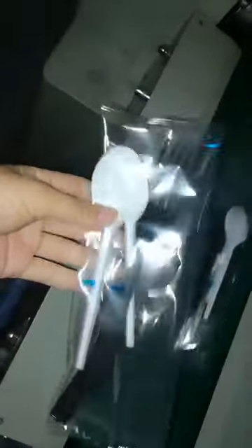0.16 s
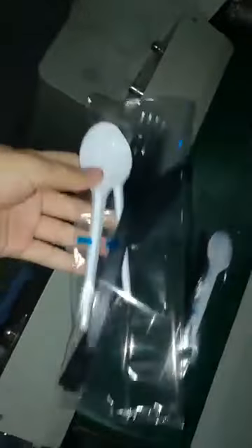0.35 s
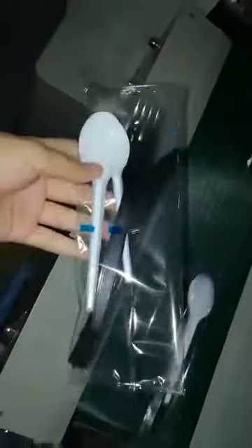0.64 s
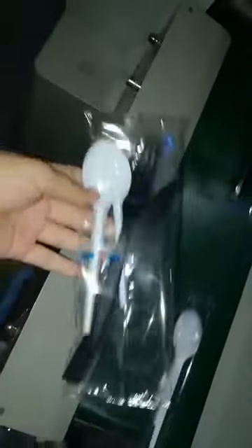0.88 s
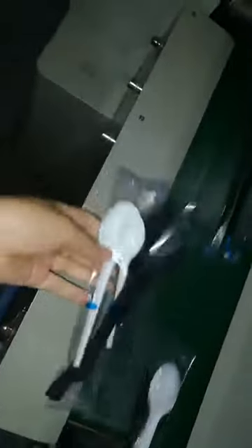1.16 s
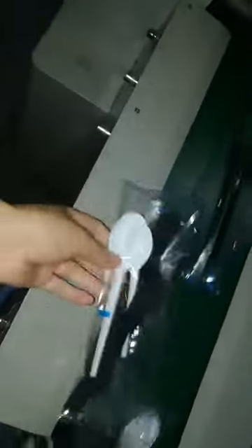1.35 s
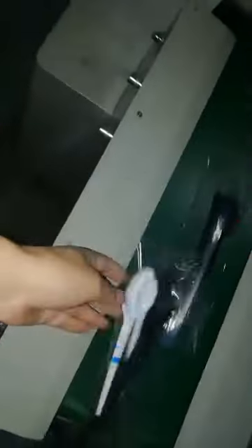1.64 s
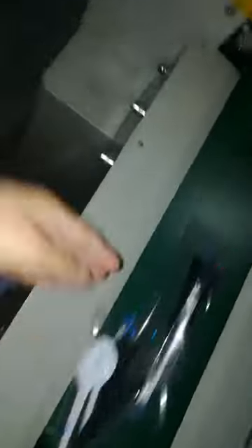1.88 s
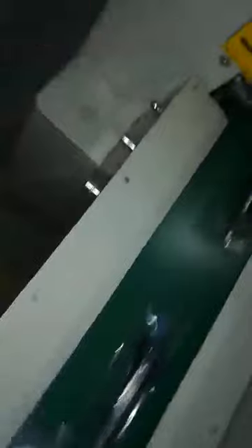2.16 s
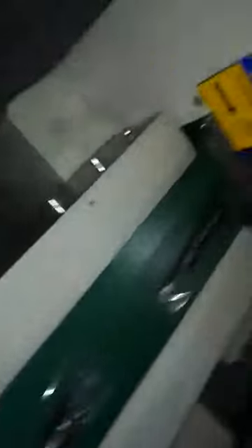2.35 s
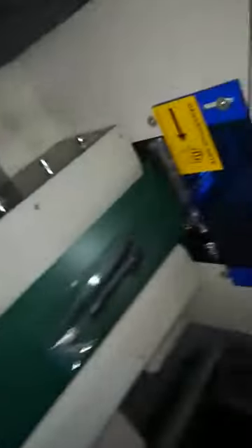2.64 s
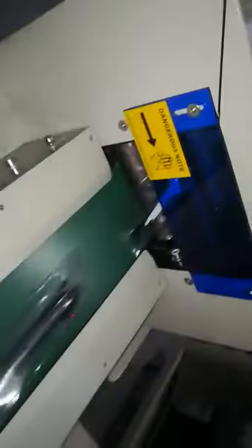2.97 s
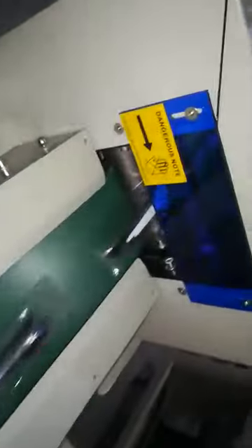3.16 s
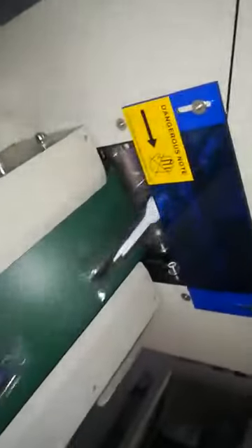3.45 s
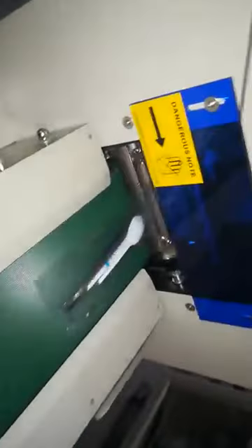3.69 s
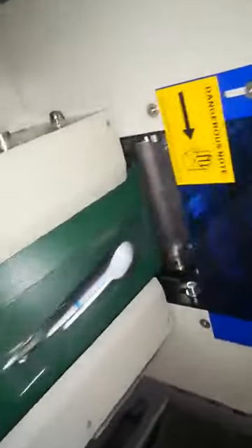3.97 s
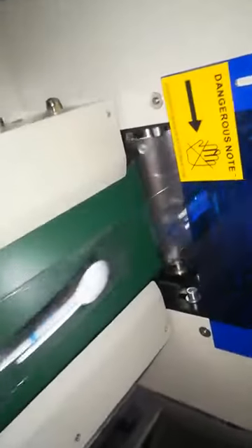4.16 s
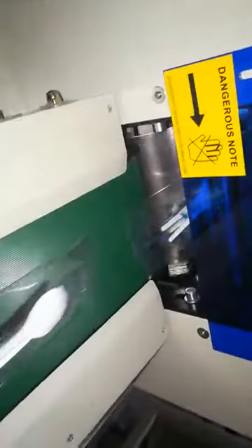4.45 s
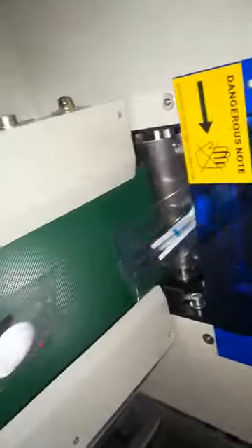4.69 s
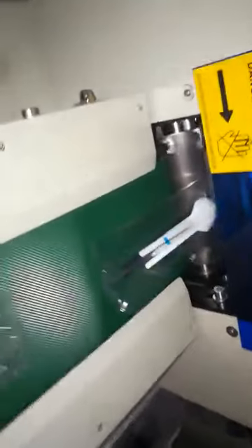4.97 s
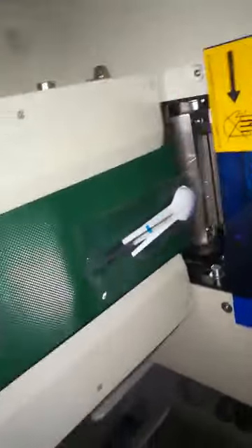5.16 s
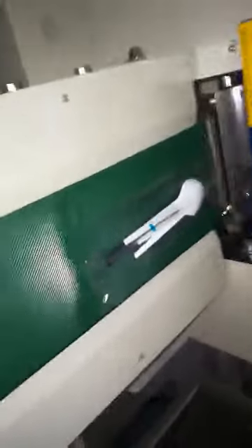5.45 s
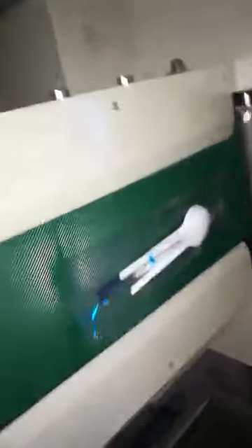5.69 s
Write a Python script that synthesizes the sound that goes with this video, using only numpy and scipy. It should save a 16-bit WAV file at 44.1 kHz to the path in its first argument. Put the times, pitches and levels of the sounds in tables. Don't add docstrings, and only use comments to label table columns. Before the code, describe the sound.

Steady film hiss and low motor hum in a workshop, opened by a sharp bag snap and later broken by crackles and tiny steel rings.

```python
import sys
import numpy as np
from scipy import signal
from scipy.fft import rfft, irfft
from scipy.io import wavfile
from scipy.ndimage import uniform_filter1d

SR = 44100
rng = np.random.default_rng(int(sys.argv[2]) if len(sys.argv) > 2 else 0)


def store_pcm(level_fs):
    pcm = np.round(np.clip(level_fs, -1, 1) * 32767).astype(np.int16)
    wavfile.write(sys.argv[1], SR, np.atleast_2d(pcm).T)


def voltage_ratio(decibels):
    exponent = np.asarray(decibels, float) / 20
    return 10 ** exponent


N = 256662
T = np.arange(N) / SR
HZ = np.fft.rfftfreq(N, 1 / SR)

# [start_s, openness_db, standing_wave_valley_hz]
PLACE = [(0, 0.5, 680), (.6, -0.5, 690), (1.1, 0, 654), (1.6, -1.5, 630), (2.05, 0, 546), (2.9, -0.5, 450),
         (3.2, 1.5, 430), (3.6, -0.5, 461), (4.1, 1, 550), (4.26, 7, 530), (4.9, 8, 530), (5.2, 6.5, 510),
         (5.82, 6.5, 488)]

# [start_s, hiss_db, sheen_db, left_minus_right_db]
FILM = [(.3, -37.5, 3, 0), (.8, -36.5, -0.5, -1), (1.2, -37.5, -2, -2), (1.6, -39.5, -2, -2),
        (1.95, -39, -0.5, 1), (2.55, -35, -3.5, -1), (2.8, -32, -7, 1), (3.1, -33.5, -5, 0),
        (3.45, -32.5, -5.5, 2.5), (3.7, -39.5, -2, 3.5), (4.0, -40, -2.5, 4), (4.16, -38.5, -2, 2.5),
        (4.25, -33, -3, 4.5), (4.5, -31, -5.5, 0), (5.1, -32.5, -2.5, -1.5), (5.34, -30.5, -4, 0),
        (5.47, -34.5, -2, -1), (5.8, -33.5, -1, 3.5)]
FILM_EDGES = [1700, 3200, 6000, 9700]


def film():
    body_db, sheen_db, pan_db = curves(FILM)
    open_db = curves(PLACE)[0]
    pops_per_s, pop_fade_s = 500, .001
    pops = (rng.random(N) < pops_per_s / SR) * voltage_ratio(3 * rng.exponential(size=N))
    grain = 1 + .2 * signal.lfilter([1], [1, -np.exp(-1 / (pop_fade_s * SR))], pops)
    hiss = reflections(noise_pair(), fine_db=3.0, broad_db=0.25) * grain
    rustle_db = .35 * walk(11)
    low_db = -4.5 + 0.74 * sheen_db
    air_db = -8 + 0.69 * sheen_db + 0.13 * open_db + glint()
    out = np.zeros((2, N))
    for band, tilt_db in zip(bands(hiss, ports(), FILM_EDGES), [low_db, 0, sheen_db, air_db]):
        out += band * voltage_ratio(body_db + tilt_db + rustle_db + 0.2 * walk(20))
    return panned(out, pan_db - np.mean(pan_db))


def glint():
    jaws_s, rise_s, fade_s, lead_s = 4.24, 0.11, 0.27, 1
    late, early = np.maximum(T - jaws_s, 0), np.maximum(jaws_s - T, 0)
    flare_db = 7.5 * np.exp(-late / fade_s - (early / rise_s) ** 2)
    return flare_db + 1.5 * np.exp(-early / lead_s)


# [start_s, body_db, air_db, t60_s, left_minus_right_db]
SNAP = [
    (.1165, -14, -33, .06, -1.5),
    (.1205, -18, -32, 0.045, 1),
    (.1245, -23, -15, 0.029, 6),
    (.1266, -9, -9.5, 0.016, 7),
    (.131, -14.5, -18, 0.041, -1.5),
    (.135, -29, -40, 0.71, -2),
    (.142, -29, -26, .045, -7),
    (.1915, -27.5, -45, 0.095, -5),
    (.206, -39, -46, 0.063, 0),
]
# [pitch_hz, lift_db]
BAG_LIFT = [(380, 2), (750, 14.5), (1500, 10.5), (3200, 11), (5000, 15.5), (6200, 1), (8500, 11),
            (12000, 7.5)]


def bag_snap():
    return creases(SNAP, BAG_LIFT)


# [start_s, body_db, air_db, t60_s]
CRUNCH = [(1.3, -47, -38, 0.56), (1.49, -31, -44, 0.091), (1.51, -34, -43, 0.067), (1.526, -35, -44, .04),
          (1.685, -44, -48, .06), (2.4, -37, -38, .048), (2.683, -24, -46, .05), (2.747, -26, -45, .047),
          (2.803, -26, -36, 0.093), (2.821, -24, -28, 0.11), (2.841, -28.5, -39, 0.17),
          (2.928, -40, -36, .05), (3.133, -37, -42, .046), (3.184, -29.5, -35, 0.17),
          (3.228, -30.5, -30, 0.099), (3.32, -37, -31, 0.091), (3.385, -40, -38, .1),
          (3.448, -30, -39, 0.084), (4.365, -34, -21.5, 0.11), (4.54, -26, -30, .084),
          (4.797, -28, -30, 0.06), (4.983, -31, -23, 0.046), (5.008, -20, -35, .05),
          (5.319, -27.5, -43, 0.32), (5.351, -30, -43, 0.16)]
# [start_s, left_minus_right_db]
CRUNCH_PAN = [(1.5, -6), (2.5, -3), (3.2, 12), (3.5, 5), (4.5, 2), (5.3, 3)]
# [pitch_hz, lift_db]
RUSTLE_LIFT = [(1500, -5.5), (3500, -1), (5200, 3), (6500, -12), (11000, 9)]


def belt_crunches():
    belt = [(*row, np.interp(row[0], *np.transpose(CRUNCH_PAN))) for row in CRUNCH]
    return creases(belt, RUSTLE_LIFT)


def creases(table, lift):
    rise_s, split_hz = .0005, 6500
    envelope = np.zeros((2, 2, N))
    for s, body_db, air_db, t60, pan_db in table:
        i = int(s * SR)
        age = T[i:i + 12000] - s
        shape = (1 - np.exp(-np.abs(age) / rise_s)) * voltage_ratio(-60 * age / t60)
        strength = voltage_ratio(np.array([body_db, air_db]))
        envelope[..., i:i + len(age)] += np.multiply.outer(strength, panned(shape, pan_db))
    gain = ports() * voltage_ratio(over_hz(lift))
    air = above(split_hz)
    rough = noise_pair() * voltage_ratio(1.2 * walk(900))
    out = np.zeros((2, N))
    for level, part in zip(envelope, [1 - air, air]):
        out += colour(rough * level, gain * part) / np.sqrt(np.mean((gain * part) ** 2))
    return out


# [pitch_hz, level_db, t60_s]
CLACK = [(783, -7.5, 3.7), (1630, -4.5, 0.23), (1870, -22, 0.096), (2870, -1, 0.17), (3280, 1.5, 0.1),
         (4200, -19, 0.16), (4560, -13, 0.049), (4750, -3, 0.062), (5240, -23, 0.31), (5700, -4, 0.25)]


def clack():
    start_s, level_db, rise_s, longest_t60 = .1262, -20, .0008, .09
    age = np.maximum(T - start_s, 0)[:SR // 2]
    rings = np.zeros((2, len(age)))
    for (hz, db, t60), turn in zip(CLACK, rng.random((len(CLACK), 2))):
        phase = turn[0] + .25 * turn[1] * np.array([[0], [1]])
        rings += voltage_ratio(db - 60 * age / min(t60, longest_t60)) * np.sin(2 * np.pi * (hz * age + phase))
    return np.pad(voltage_ratio(level_db) * rings * np.minimum(age / rise_s, 1), ((0, 0), (0, N - len(age))))


# [pitch_hz, left_db, right_db]
PARTS = [
    [(5724, 0, -7), (3424, -13, -5)],
    [(5165, 0, -9)],
    [(8796, -18, 0), (12174, -36, -14), (12834, -38, -19)],
    [(8163, -3, 0), (11620, -26, -12)],
]
# [start_s, held_s, level_db, left_minus_right_db]
TOUCHES = [
    [(4.482, 0.088, -23.5, 0), (4.55, 0.049, -31, 2), (4.595, .05, -31, 7), (4.655, 0.14, -34, -9),
     (4.77, .19, -35, 0)],
    [(4.49, .04, -29, 6), (4.538, 0.07, -27, 10), (4.61, .09, -36, 1), (4.74, .13, -33, -5)],
    [(4.505, 0.028, -28, -3), (4.533, 0.056, -23, -7), (4.70, .17, -31, 2)],
    [(4.60, .05, -25, 7), (4.668, .04, -26, -2), (4.728, 0.038, -25.5, -9), (4.778, .09, -35, -6)],
]


def jingle():
    level_db, rise_s, t60, choke_s, left_over_db, beat_hz = 3, .007, .6, .018, -14, 45
    out = np.zeros((2, N))
    for modes, touches in zip(PARTS, TOUCHES):
        for (s, held, db, pan_db), turn in zip(touches, rng.random((len(touches), 3))):
            i = int(s * SR)
            age = T[i:i + 20000] - s
            choke = np.exp(-np.maximum(age - held, 0) / choke_s) + voltage_ratio(left_over_db - 79 * age)
            beat = 1 + 0.13 * np.sin(2 * np.pi * (beat_hz * age + turn[2]))
            shape = (1 - np.exp(-np.abs(age) / rise_s)) * voltage_ratio(db - 60 * age / t60) * choke * beat
            phase = turn[0] + np.array([[0], [.2 * turn[1]]])
            ring = np.zeros((2, len(age)))
            for hz, *ports_db in modes:
                ring += voltage_ratio(np.array(ports_db))[:, None] * np.sin(2 * np.pi * (hz * age + phase))
            out[:, i:i + len(age)] += panned(ring * shape, pan_db)
    return voltage_ratio(level_db) * out


# [start_s, held_s, level_db]
MOTOR = [(.15, 0.11, -50), (.42, 0.056, -53), (.72, 0.12, -50.5), (1.0, 0.037, -54), (1.28, .3, -55),
         (1.92, .1, -49.5), (2.05, 0.27, -49), (2.5, 0.062, -53), (2.73, .05, -55), (3.07, 0.13, -49),
         (3.27, 0.14, -48), (3.6, .18, -56), (3.89, 0.035, -51), (4.2, .08, -43), (4.45, 0.073, -43),
         (4.76, .13, -45.5), (5.03, 0.044, -43.5), (5.15, 0.038, -50), (5.36, 0.039, -45),
         (5.62, 0.11, -43.5)]
# [start_s, held_s, level_db, pitch_hz]
GEAR = [(.75, .06, -48.5, 265), (.95, 0.25, -50.5, 285), (1.22, 0.13, -57, 260), (1.38, 0.05, -57, 278),
        (1.68, 0.2, -51.5, 289), (2.08, 0.075, -48, 280), (2.26, 0.11, -52, 268), (2.54, 0.026, -49.5, 272),
        (2.7, 0.084, -54, 290), (3.8, 0.095, -55.5, 250), (4.22, 0.14, -49.5, 250.3),
        (4.8, 0.27, -61, 240.4), (5.3, .12, -51, 268.8), (5.62, 0.18, -52, 332)]


def motor():
    casing_hz, frame_hz, frame_db = 177.1, 106.5, -58
    gear_middle_s = [s + held / 2 for s, held, *_ in GEAR]
    gear_hz = np.interp(T, gear_middle_s, [row[-1] for row in GEAR])
    casing = tone(casing_hz + 2.5 * walk(14), swells(MOTOR, idle_db=-59) - 2 + 2 * walk(18))
    gear = tone(gear_hz + 7 * walk(15), swells(GEAR, idle_db=-70) - 1 + 3 * walk(22))
    frame = tone(frame_hz + 4 * walk(9), frame_db + curves(PLACE)[0] - 8 + 5 * walk(13))
    return casing + gear + frame


def swells(table, idle_db):
    swell_s = 0.034

    def rise(s):
        return np.clip((T - s) / swell_s + .5, 0, 1) ** 2

    total = voltage_ratio(idle_db)
    for s, held, db, *_ in table:
        total = total + voltage_ratio(db) * (rise(s) - rise(s + held + swell_s))
    return 20 * np.log10(total)


# [start_s, level_db]
WHINE = [(0, -57), (1.5, -48), (2.2, -65), (3, -50.5), (3.7, -45.5), (4.1, -48.5), (4.7, -53), (4.95, -50),
         (5.82, -48)]
# [pitch_hz, level_db]
WHINE_LINES = [(9997, -3), (9964, -5), (10026, -6), (9808, -10), (10190, -11), (15052, -29)]


def whine():
    db = curves(WHINE)[0] + curves(PLACE)[0]
    lines = sum(tone(hz + 7 * walk(25), db + line_db + 4 * walk(22)) for hz, line_db in WHINE_LINES)
    return lines * voltage_ratio(np.array([[-22], [4]]))


# [pitch_hz, density_db_per_hz]
HALL_COLOUR = [(15, -50), (25, -3.5), (49, -13), (91, 1.5), (129, -3.5), (184, 1.5), (301, 2.5), (386, -23),
               (633, -21.5), (1060, -16), (1350, -18), (1800, -18.5), (2210, -101), (3740, -120)]
HALL_EDGES = [0, 360, 560, 850]
# [centre_hz, level_db over the rumble, extra_share of openness, valley_depth_db]
ROAR = [(450, -10, 0.54, 5.5), (690, -9.5, 0.23, 8), (1200, -3.5, -.1, .5)]


def hall():
    rumble_db, valley_octaves = -48, 0.47
    open_db, valley_hz = curves(PLACE)
    levels_db = [-2.5]
    for hz, db, share, depth_db in ROAR:
        valley = np.exp(-(np.log2(valley_hz / hz) / valley_octaves) ** 2)
        levels_db.append(db + share * open_db - depth_db * valley)
    roar = reflections(noise_pair(), fine_db=1.8, broad_db=.4)
    out = np.zeros((2, N))
    for band, db in zip(bands(roar, voltage_ratio(over_hz(HALL_COLOUR)), HALL_EDGES), levels_db):
        out += band * voltage_ratio(rumble_db + open_db + db + .8 * walk(5.6))
    return out


# [pitch_hz, share_0_to_1]
ALIKE = [(60, 1), (200, 0.93), (340, 0.7), (500, 0), (1000, 0.14), (3800, 0.1), (5300, 0.14), (5750, 0.92),
         (6900, 0.85), (7700, 0.17), (15000, 0)]


def noise_pair():
    lag_s = 18 / SR
    left, own = rfft(rng.standard_normal((2, N)))
    share = np.clip(over_hz(ALIKE), 0, .999)
    late = np.exp(-2j * np.pi * HZ * lag_s * (HZ > 450) * (HZ < 5500))
    right = share * left * late + np.sqrt(1 - share ** 2) * own
    return irfft(np.array([left, right]), N)


# [pitch_hz, density_db_per_hz]
LEFT_PORT = [(500, -18), (1400, -60), (1900, -3.5), (3000, -9.5), (3700, -3), (4400, -1), (5200, 3.5),
             (5900, 1), (6600, -4), (8800, -16), (10000, -93), (11000, -76), (12500, -99), (15500, -43)]
# [pitch_hz, density_db_per_hz]
RIGHT_PORT = [(500, -12), (1400, -4), (1900, -4.5), (2400, 0.5), (3200, 1), (4500, -1), (5200, -1.5),
              (5800, -1), (6500, -2.5), (8600, 2.5), (10300, -6), (11300, -10), (14600, -18), (15800, -26)]


def ports():
    return voltage_ratio(np.array([over_hz(LEFT_PORT), over_hz(RIGHT_PORT)]))


def reflections(x, fine_db, broad_db, hold=14):
    spectra = signal.stft(x, nperseg=2048)[2]
    for db, size in [(fine_db, 2), (broad_db, 24)]:
        ridges = uniform_filter1d(rng.standard_normal(spectra.shape[1:]), size, axis=0)
        ridges = uniform_filter1d(ridges, hold, axis=1, mode="wrap")
        spectra = spectra * voltage_ratio(db * np.clip(ridges / np.std(ridges), -3, 1.7))
    return signal.istft(spectra, nperseg=2048)[1][:, :N]


def bands(x, gain, edges):
    steps = [above(hz + 1) for hz in edges] + [0]
    return [unit(colour(x, gain * (lower - upper))) for lower, upper in zip(steps, steps[1:])]


def unit(x):
    return x / np.sqrt(np.mean(np.mean(x, axis=0) ** 2))


def colour(x, gain):
    return irfft(rfft(x) * gain, N)


def above(hz):
    return np.clip(.5 + 6 * np.log((HZ + 1) / hz), 0, 1)


def panned(x, pan_db):
    return x * voltage_ratio(np.array([[1], [-1]]) * pan_db / 2)


def tone(hz, db):
    turns = np.cumsum(hz + 0 * T) / SR + rng.random()
    return np.sqrt(2) * voltage_ratio(db) * np.sin(2 * np.pi * turns)


def walk(rate):
    k = int(SR / rate)
    held = np.repeat(rng.standard_normal(N // k + 1), k)
    return 1.3 * uniform_filter1d(uniform_filter1d(held, k), k)[:N]


def curves(table):
    s, *columns = np.transpose(table)
    return [np.interp(T, s, c) for c in columns]


def over_hz(table):
    hz, value = np.transpose(table)
    return np.interp(np.log(HZ + 1), np.log(hz), value)


def scene():
    return film() + bag_snap() + belt_crunches() + clack() + jingle() + motor() + whine() + hall()


def band_limit(x):
    return signal.sosfilt(signal.butter(12, 15830, fs=SR, output="sos"), x)


def record(dry):
    rounded = np.tanh(0.96 * dry) / 0.85
    mix = colour(rounded, HZ < 15830)
    return band_limit(mix)


dry = scene()
out = record(dry)
store_pcm(out)
```